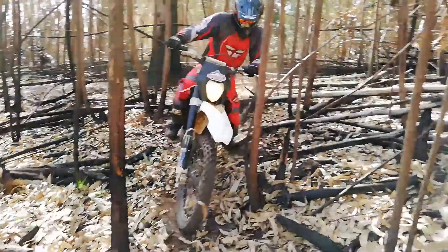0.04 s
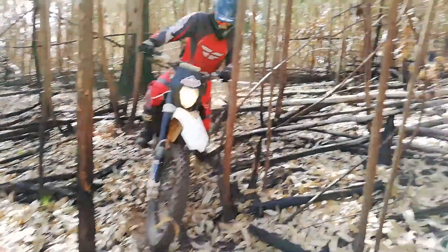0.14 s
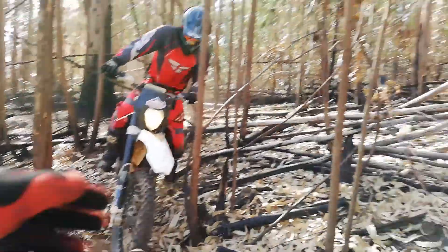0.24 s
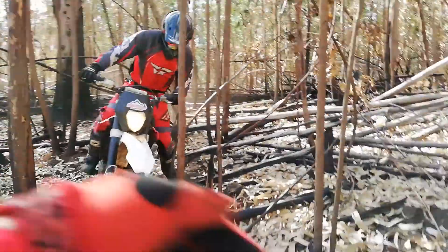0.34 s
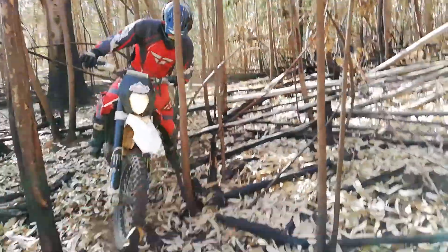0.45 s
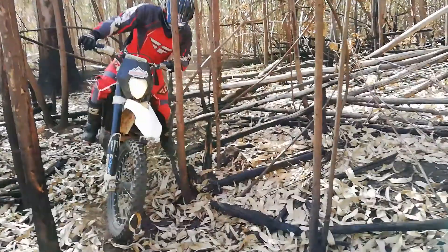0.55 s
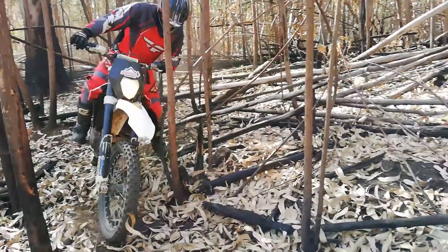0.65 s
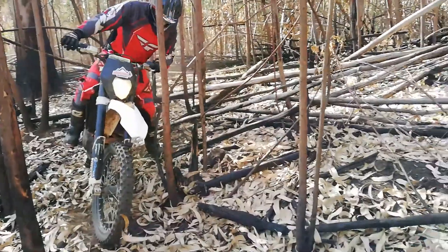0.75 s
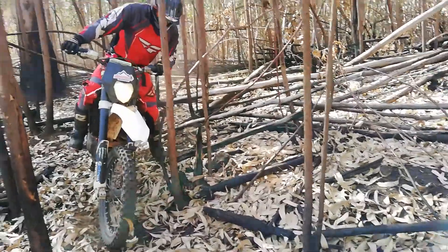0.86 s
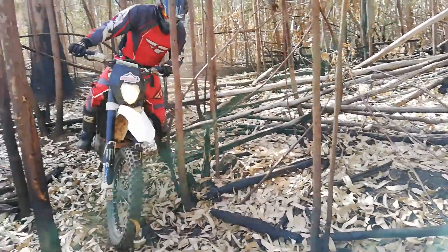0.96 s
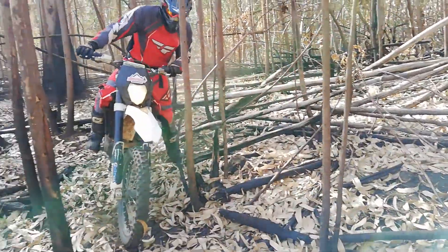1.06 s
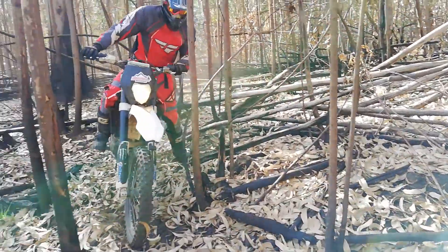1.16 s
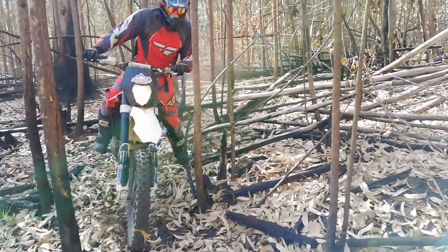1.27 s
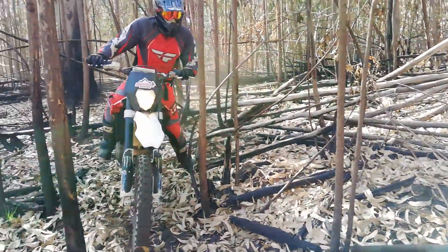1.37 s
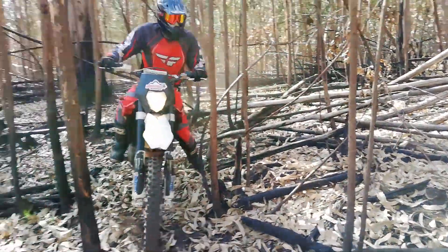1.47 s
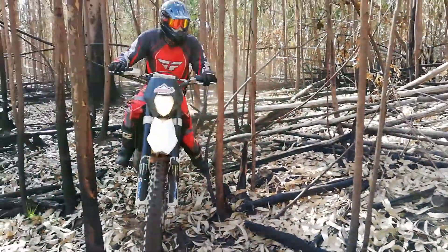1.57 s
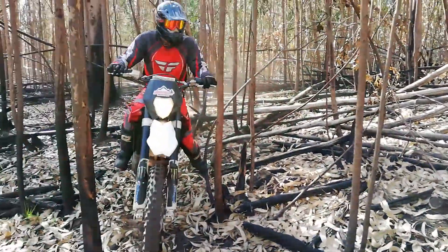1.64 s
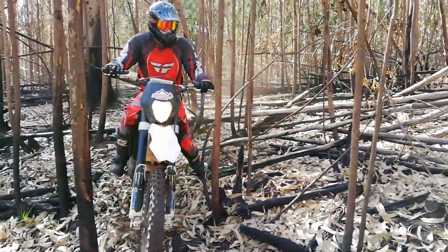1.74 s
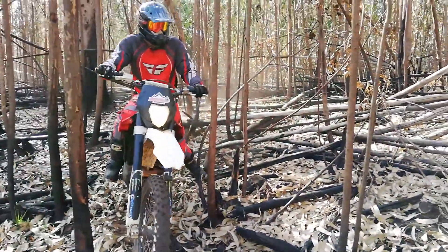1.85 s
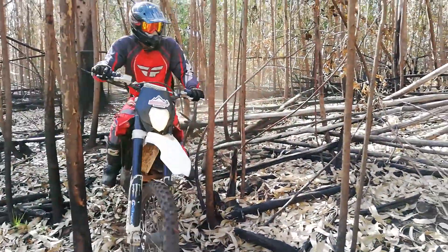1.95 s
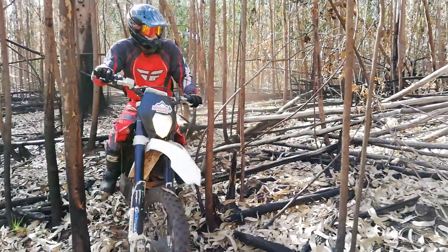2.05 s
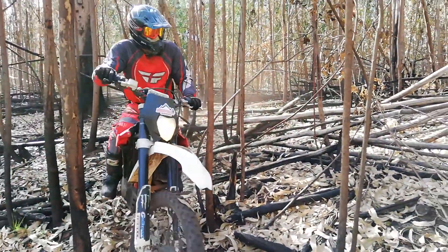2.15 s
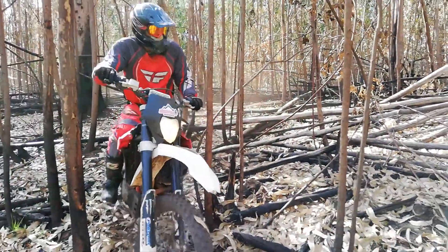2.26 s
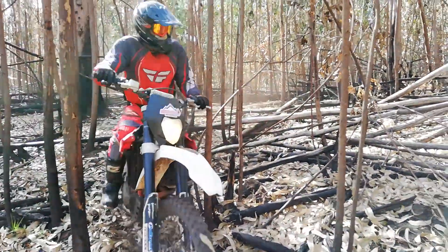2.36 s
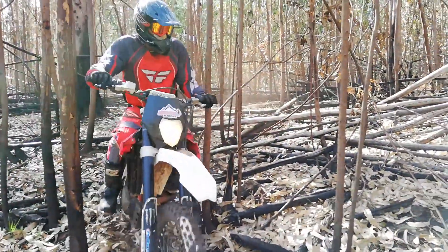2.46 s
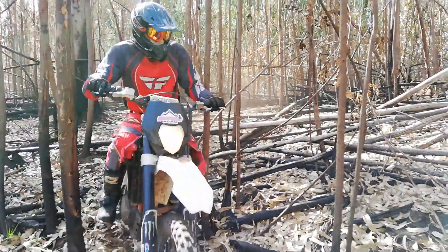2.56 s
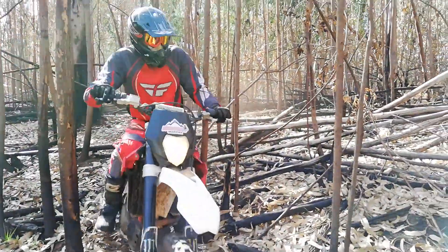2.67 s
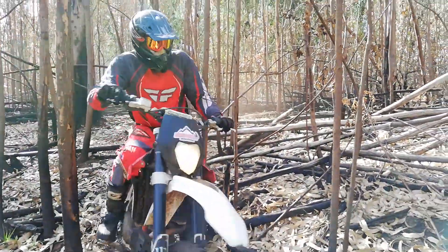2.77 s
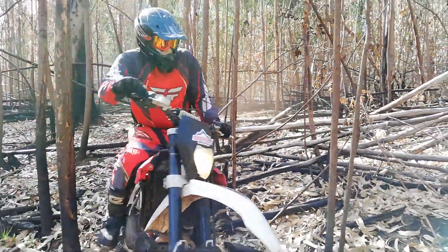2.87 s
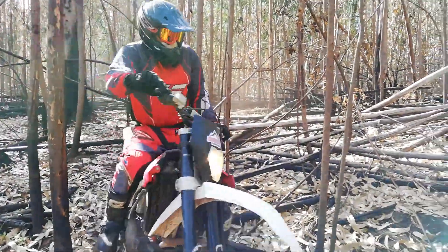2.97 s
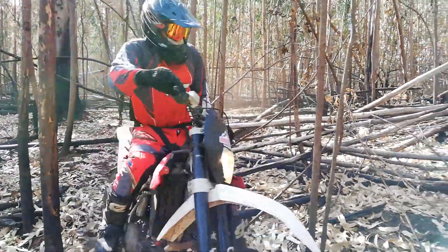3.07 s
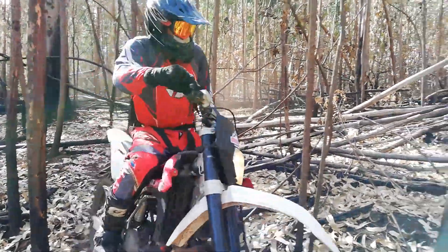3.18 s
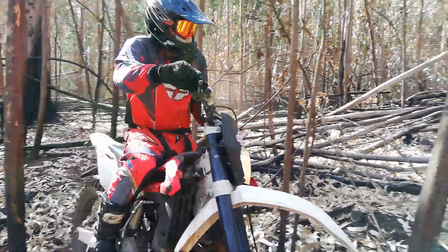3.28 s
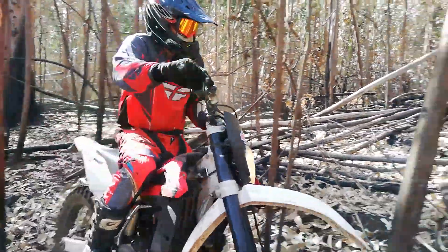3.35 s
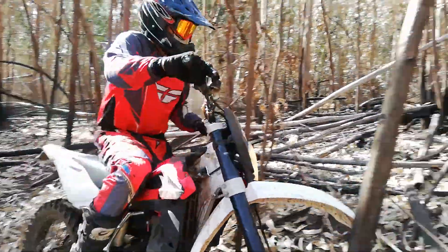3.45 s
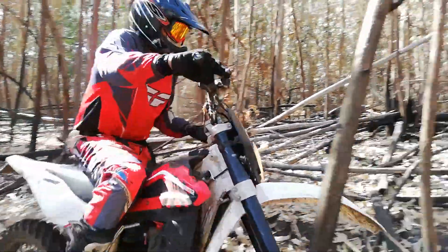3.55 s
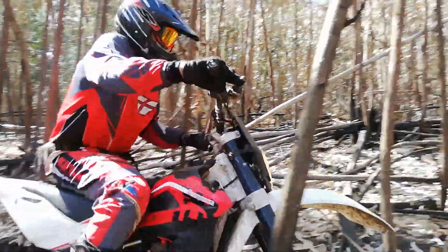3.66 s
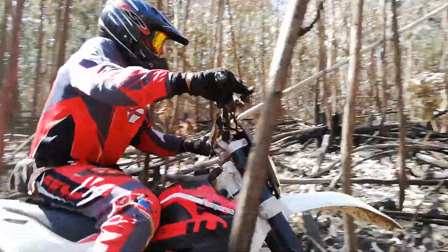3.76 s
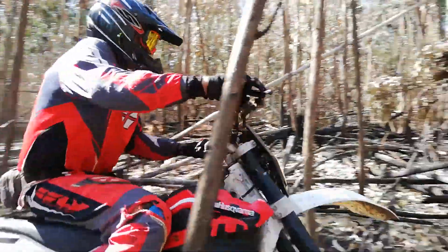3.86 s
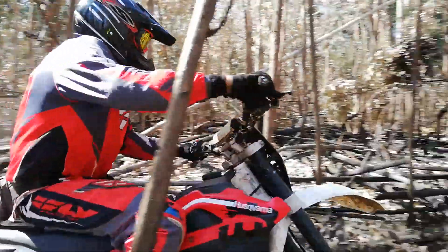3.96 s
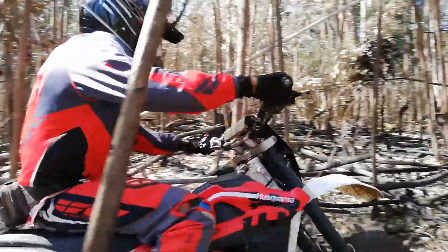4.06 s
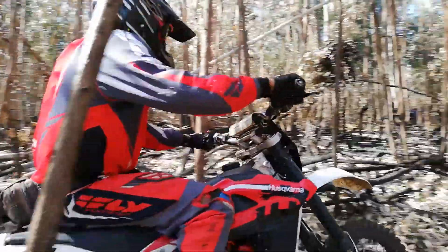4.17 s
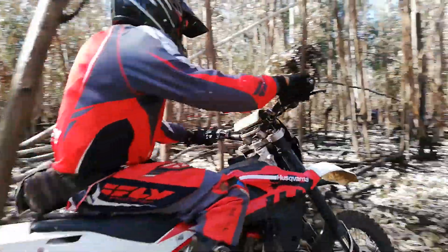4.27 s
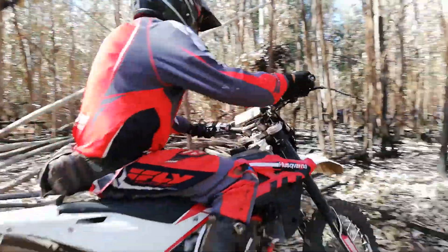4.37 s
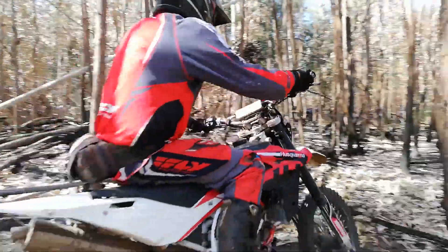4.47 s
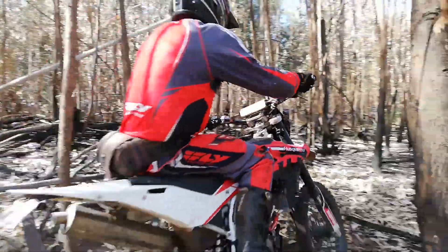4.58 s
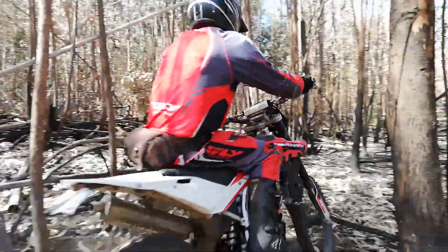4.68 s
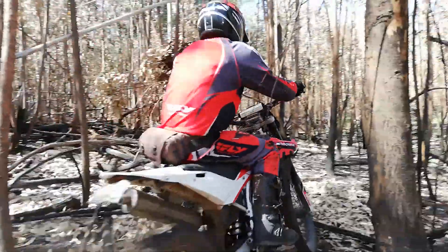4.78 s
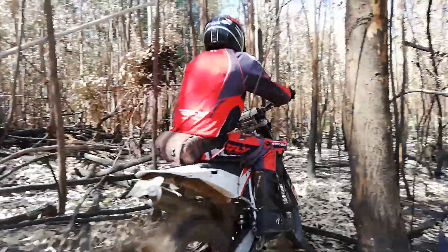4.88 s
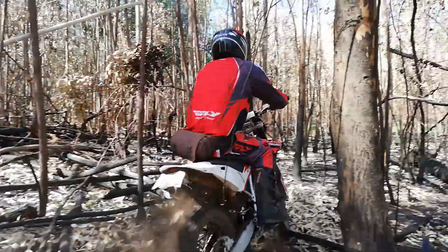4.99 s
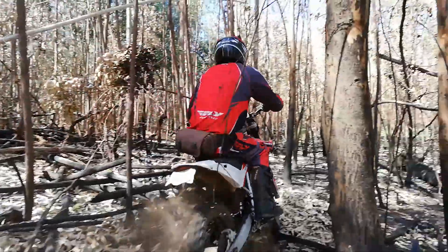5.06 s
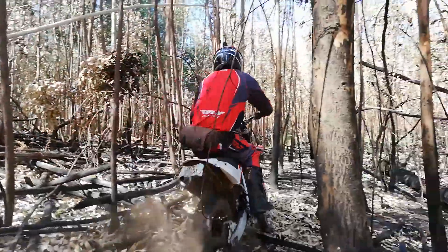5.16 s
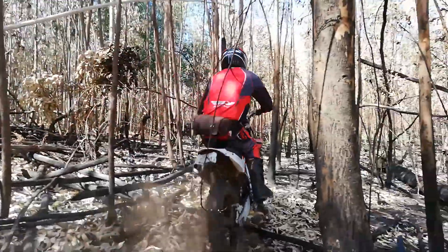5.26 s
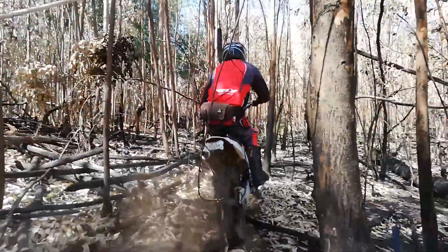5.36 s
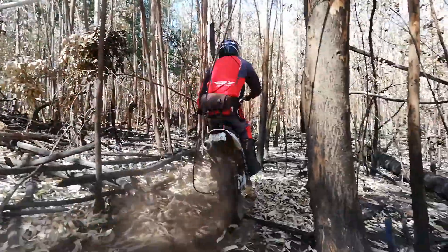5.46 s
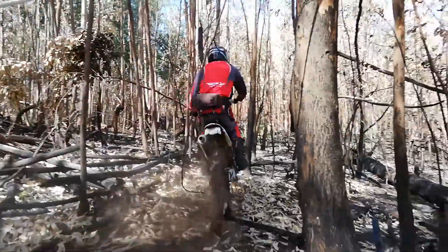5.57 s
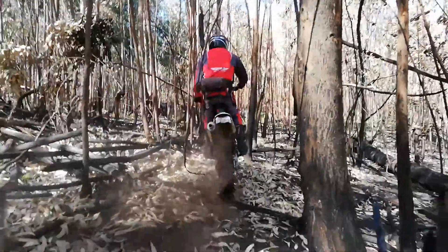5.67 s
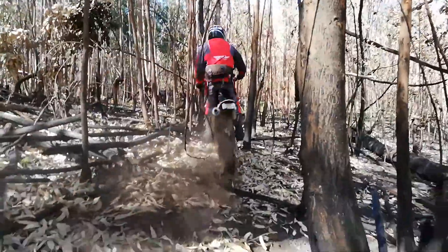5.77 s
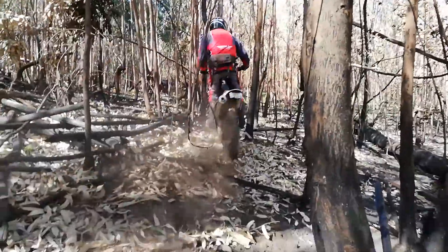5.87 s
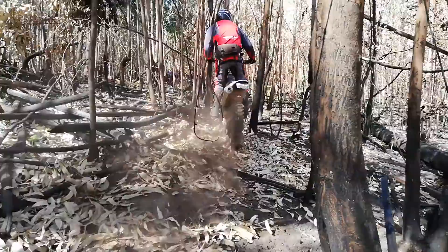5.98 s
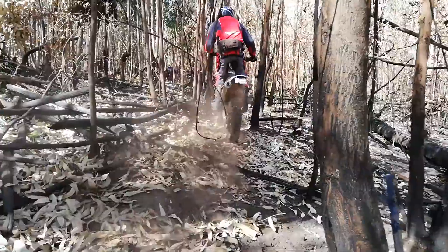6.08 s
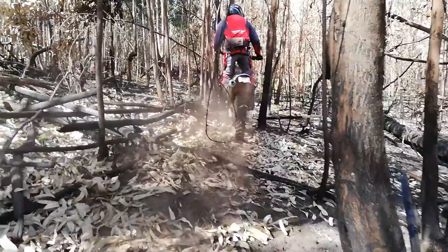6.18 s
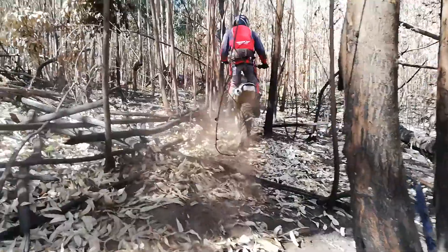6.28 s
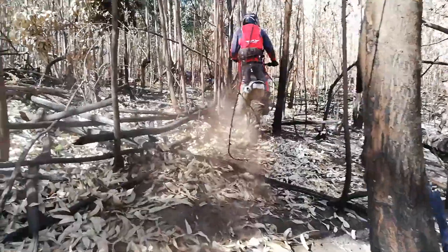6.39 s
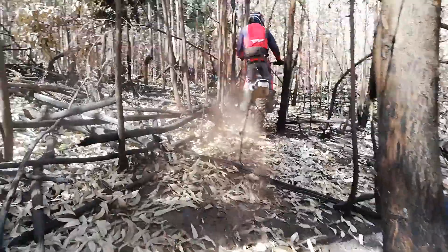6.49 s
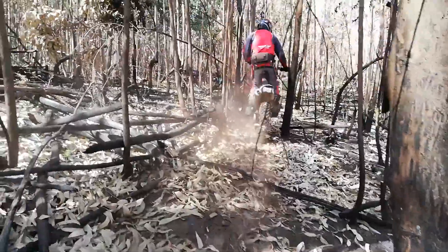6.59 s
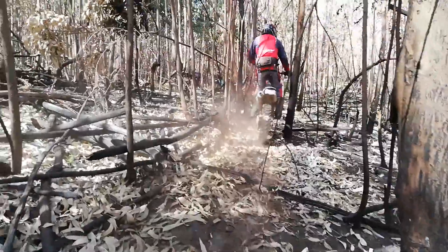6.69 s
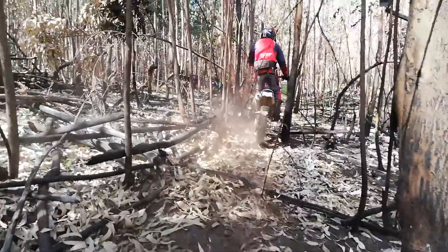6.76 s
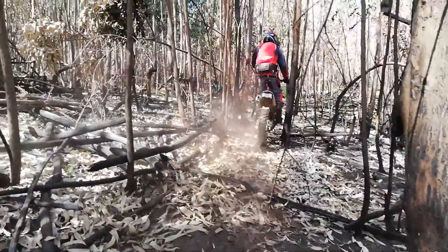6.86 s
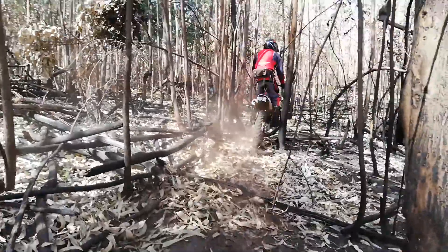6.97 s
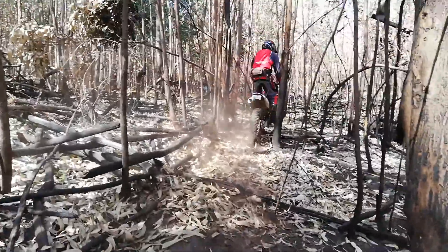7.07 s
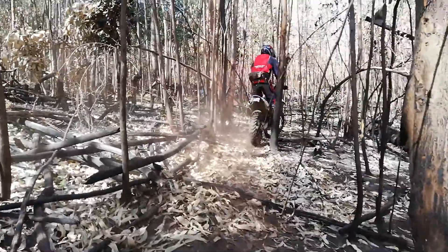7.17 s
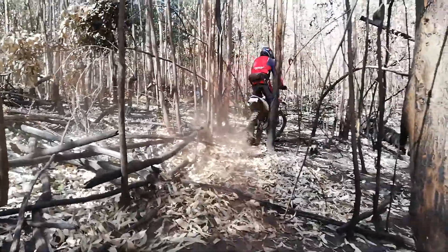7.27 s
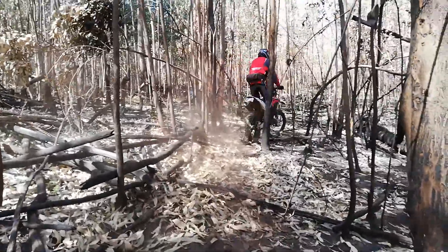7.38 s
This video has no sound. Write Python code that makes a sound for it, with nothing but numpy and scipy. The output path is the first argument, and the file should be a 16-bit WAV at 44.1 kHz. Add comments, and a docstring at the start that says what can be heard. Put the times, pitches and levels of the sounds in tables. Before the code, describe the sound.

A single-cylinder dirt bike idles close by, blips its throttle, creeps past over crackling leaves and pulls away among trees as twigs snap.

```python
"""Among trees, dry leaves underfoot: a single-cylinder four-stroke dirt bike idles about three metres away,
gets a blip of throttle, creeps past within a metre of the microphone and rides off to some six metres.
Each firing thumps through silencer resonances and rings the metal shell; valves and clatter are pulsed noise.
Grainy noise makes the leaves under the tyres and the branches that crack and sweep through the litter.
Twigs snap as short noise bursts; the brake and gears sing as wavering tones."""
import sys
import numpy as np
from scipy import signal
from scipy.fft import rfft, irfft, next_fast_len
from scipy.io import wavfile
from scipy.ndimage import map_coordinates

SR = 44100
rng = np.random.default_rng(int(sys.argv[2]) if len(sys.argv) > 2 else 0)


def inscribe(sig):
    """Save sig as 16-bit PCM at rate SR to the path in sys.argv[1].

    A 1-D sig is mono; a 2-D sig holds one channel per row.
    Samples are clipped to [-1, 1] before scaling.
    """
    pcm = np.round(np.clip(np.atleast_2d(sig).T, -1, 1) * 32767)
    wavfile.write(sys.argv[1], SR, pcm.astype(np.int16))


N = 327663
CRUISE_RATE, NEAR_M = 18, 2  # reference engine speed (firings per second) and distance (m)


def amp(db):
    """Decibels to gain."""
    return 10 ** (np.asarray(db) / 20)


def unit(x):
    """Scale to rms 1."""
    return x / np.sqrt(np.mean(x ** 2) + 1e-20)


def along(points, hz):
    """(pitch_hz, value) points read on a log frequency axis."""
    f, v = np.transpose(points)
    return np.interp(np.log(hz + 1), np.log(f + 1), v)


def clock():
    """The time of every sample in seconds."""
    return np.arange(N) / SR


def curves(rows):
    """One value per sample for each column after the time."""
    s, *cols = np.transpose(rows)
    return [np.interp(clock(), s, c) for c in cols]


def wobble(rate):
    """A smooth random curve, rate knots a second."""
    knots = rng.standard_normal(int(N * rate / SR) + 4)
    return map_coordinates(knots, [np.arange(N) * rate / SR])


def filtered(x, response):
    """x times a response of frequency."""
    m = next_fast_len(N + SR // 2)
    return irfft(rfft(x, m) * response(np.fft.rfftfreq(m, 1 / SR)), m)[..., :N]


def resonance(hz, centre, width):
    """A steep-sided resonance peak of height 1."""
    return (hz * width) ** 2 / ((hz * width) ** 2 + (hz * hz - centre ** 2) ** 2)


def causal(gain):
    """The shortest causal ring with this gain, along the last axis (minimum phase by cepstrum)."""
    cepstrum = irfft(np.log(np.maximum(gain, 1e-6)))
    half = cepstrum.shape[-1] // 2
    fold = np.r_[1, np.full(half - 1, 2), 1, np.zeros(half - 1)]
    return irfft(np.exp(rfft(cepstrum * fold)))


def add(track, s, sound):
    """Mix a sound into a track at time s."""
    part = track[..., max(0, round(s * SR)):][..., :sound.shape[-1]]
    part += sound[..., :part.shape[-1]]


# left-right likeness of the noises at the microphone: (pitch_hz, likeness 0-1)
LIKENESS = [(200, 0.97), (600, 0.26), (1200, 0.66), (2200, 0.025), (5000, 0.035), (15000, .03)]
# resonant peaks shared by all the noises: (pitch_hz, width_hz, level_db)
NOISE_PEAKS = [(1010, 74, 0), (1182, 20, 0), (1540, 83, 1.5), (3540, 150, -1.5), (6620, 63, 4.5),
               (8600, 70, -1.5)]


def rush(spectrum, grain_db):
    """Stereo noise, its middle at rms 1, clumped into tiny grains and coloured by shared resonant peaks."""
    pair = rng.standard_normal((2, N)) * amp(grain_db * wobble(1500))

    def colour(hz):
        turn = np.arccos(np.clip(along(LIKENESS, hz), 0, 1)) / 2
        peaks_db = sum(db * resonance(hz, centre, width) for centre, width, db in NOISE_PEAKS)
        return amp(along(spectrum, hz) + peaks_db) * [np.cos(turn), np.sin(turn)]

    mid, side = filtered(pair, colour)
    return np.array([mid + side, mid - side]) / np.std(mid)


# engine speed: (time_s, firings_per_s)
ENGINE_SPEED = [(0.0, 13.621), (0.255, 13.892), (0.326, 12.584), (1.262, 11.874), (1.432, 18.499),
                (1.699, 25.739), (1.887, 26.558), (2.153, 16.904), (2.421, 16.127), (2.644, 19.172),
                (2.797, 17.418), (3.303, 22.072), (3.649, 19.966), (3.987, 23.859), (4.479, 18.64),
                (5.08, 17.91), (5.524, 21.902), (5.668, 25.166), (6.045, 14.458), (6.556, 17.153),
                (6.948, 13.904), (7.43, 19.396)]


def firings():
    """Sample index of each firing: one per two turns of the crank."""
    cycles = np.cumsum(curves(ENGINE_SPEED)[0]) / SR + .82
    return np.flatnonzero(np.diff(np.floor(cycles)))


def bursts(fired, delay, rise, fall, scatter_db):
    """A power envelope of mean 1 with one burst per engine cycle; times in seconds from the firing."""
    t, power = np.arange(SR // 8) / SR, np.zeros(N)
    shape = (1 - np.exp(-t / rise)) ** 2 * np.exp(-t / fall)
    for i in fired:
        add(power, i / SR + delay, shape * amp(scatter_db * rng.standard_normal()) ** 2)
    return power / power.mean()


# the bike's path: (time_s, distance_m, share of the engine noise that comes from the tailpipe 0-1)
BIKE_PATH = [(0, 2.94, 0), (1.7, 3.33, 0.08), (2.85, 2.22, 0.03), (3.3, 1.24, 0.06), (3.95, 0.98, 0),
             (4.35, 1.55, 0.17), (4.8, 1.95, 0.94), (5.6, 4.7, 0.9), (6.1, 5.6, 0.4), (7.43, 5.6, 0.16)]


def facing():
    """Share of the engine noise that comes from the tailpipe."""
    return np.clip(curves(BIKE_PATH)[1], 0, 1)


# one blip, a gentle creep, then a pull away: (time_s, throttle opening 0-1)
THROTTLE_OPENING = [(0, 0.2), (1.28, 0.3), (1.6, 1), (1.92, 1), (2.08, 0.37), (3, 0.49), (4.1, 0.07),
                    (5, 0.92), (5.45, 0.63), (5.9, 0), (7.43, 0.28)]
# the bike swings round and its silencer comes into the open: (start_s, end_s)
TURN_SPAN = (3.02, 4.56)
# how each layer follows the ride: (level_db at the reference speed and distance, db per octave of revs,
# db per octave squared away from that speed, db per halving of distance, db from behind, db once turned,
# db at full throttle); the layers below add their own gains
RIDE_LEVELS = {"thud": (-24.5, -11.5, -38, 2.4, 4, 1.3, -2), "boom": (-19.5, 6, -8, 0.2, 5.5, -2.5, 1.2),
               "bark": (-27.6, 5, -9.5, 1.22, -4.4, 5.5, 3.5), "rasp": (-41.5, 6.5, -16, 10, -6, 17, 5.5),
               "clatter": (-33, 2.4, 0.3, 4.5, -0.9, -1, 6.5), "hiss": (-39.5, 2, 5, 6, -7, 4, 3.5),
               "shell": (-53, 0.5, 1.5, 1.2, 2.5, -5, 15.5), "leaves": (-39, 3.8, -2, 5, -1.9, 0, 4.24)}


def levels():
    """Each layer's level in dB, from revs, distance, heading and throttle."""
    revs = np.log2(curves(ENGINE_SPEED)[0] / CRUISE_RATE)
    near = np.log2(NEAR_M / curves(BIKE_PATH)[0])
    turned = np.interp(clock(), TURN_SPAN, [0, 1])
    throttle = curves(THROTTLE_OPENING)[0]
    ride = np.array([np.ones(N), revs, revs ** 2, near, facing(), turned, throttle])
    return {layer: np.dot(law, ride) for layer, law in RIDE_LEVELS.items()}


# silencer thud, boom, bark and rasp: (width_hz, level_db, share of the intake gulp)
SILENCER = [(59, -0.5, 0.059), (60.7, 1, 0.35), (137, 0, 0.77), (143, -2.5, 1)]
# the top silencer resonance shifts as the bike turns: (time_s, pitch_hz)
RASP_PITCH = [(0, 295), (1.2, 296), (1.7, 363), (3.3, 402), (3.9, 364), (4.4, 309), (4.9, 338), (5.4, 469),
              (6, 318), (7.43, 307)]
# firings that burn poorly as the throttle snaps shut: (time_s, level_db)
POOR_BURNS = [(2.05, -8), (5.875, -5.5)]
THUD_HZ, BOOM_HZ, BARK_HZ = 74.4, 123.9, 218.6  # low silencer resonances at the reference speed
HEAT_LIFT, BARK_LIFT = 0.11, 0.26  # powers by which thud and boom, and bark, rise with revs
BARK_NEAR_HZ = 52  # the bark sounds this much higher right beside the bike
INTAKE, INTAKE_FADE = 0.29, 2.4  # intake gulp at the reference speed; power by which it fades with revs
PASS_S, PASS_HALF_S = 4.037, 0.58  # the closest moment and half the length of the pass
# in the pass two sound paths cancel in a notch that slides down through the exhaust note
NOTCH_HZ, NOTCH_OCT_PER_S, NOTCH_WIDTH_OCT, NOTCH_DB = 181, 1, 0.33, -9


def exhaust(fired, level):
    """Each firing rings the silencer; a quarter cycle later the intake gulps."""
    hz, s = np.fft.rfftfreq(SR // 5, 1 / SR), fired[:, None] / SR
    rate = curves(ENGINE_SPEED)[0][fired, None]
    revs = rate / CRUISE_RATE
    passing = np.exp(-((s - PASS_S) / PASS_HALF_S) ** 2)
    intake = np.minimum(INTAKE * (CRUISE_RATE / rate) ** INTAKE_FADE + .25 * passing, 1)
    late = np.exp(-2j * np.pi * hz / rate * .247)
    # hotter gas at higher revs lifts the low resonances
    heat = revs ** HEAT_LIFT
    bark_hz = BARK_HZ * revs ** BARK_LIFT + BARK_NEAR_HZ * passing
    centres = THUD_HZ * heat, BOOM_HZ * heat, bark_hz, curves(RASP_PITCH)[0][fired, None]
    burn_db = sum(db * (np.abs(s - when) < .025) for when, db in POOR_BURNS)
    off_notch = np.log2((hz + 1) / NOTCH_HZ) + NOTCH_OCT_PER_S * (s - PASS_S)
    notch = amp(NOTCH_DB * passing ** 0.59 * np.exp(-(off_notch / NOTCH_WIDTH_OCT) ** 2))
    blow = gulp = 0
    for (width, db, share), layer, centre in zip(SILENCER, ("thud", "boom", "bark", "rasp"), centres):
        centre = centre * (1 + 0.015 * rng.standard_normal(rate.shape))
        # trim each peak well above its centre and below 24 Hz
        peak = resonance(hz, centre, width) / (1 + (hz / (1.28 * centre)) ** 9) / (1 + (24 / (hz + 1)) ** 3)
        with_gulp = np.abs(peak * (1 + share * intake * late)) ** 2
        peak /= np.sqrt(np.mean(with_gulp, axis=1, keepdims=True))
        scatter_db = 0.42 * rng.standard_normal(rate.shape)
        size = amp(level[layer][fired, None] + db + burn_db + scatter_db)
        power = (size * peak * notch) ** 2 * SR / rate
        blow = blow + power
        gulp = gulp + power * (share * intake) ** 2
    # a faint broad skirt under the peaks
    skirt = 0.011 / (1 + (hz / 900) ** 2)
    gulps = irfft(rfft(causal(np.sqrt(gulp) + .5 * skirt)) * late)
    thumps = causal(np.sqrt(blow) + skirt) + gulps
    out = np.zeros(N)
    for i, thump in zip(fired, thumps):
        add(out, i / SR - .0005, thump)
    return out


def airbox(fired, hz=50, db=-21, fall=0.029):
    """Near idle each slow intake stroke leaves a low, sagging throb in the airbox."""
    out, t = np.zeros(N), np.arange(SR // 8) / SR
    for i, rate in zip(fired, curves(ENGINE_SPEED)[0][fired]):
        turns = hz * (1 + 0.015 * rng.standard_normal()) * t * (1 - 1.3 * t)
        size = amp(db + rng.standard_normal()) * (12 / rate) ** 3  # weaker as revs rise
        add(out, i / SR + 0.289 / rate, size * np.exp(-t / fall) * np.sin(2 * np.pi * turns))
    return out


SURGE_DB, SURGE_DB_PER_OCT = -37, 12  # throb gain at the reference speed, and its growth with revs


def surge():
    """At high revs the pumped air throbs at the firing rate and its octave."""
    rate = curves(ENGINE_SPEED)[0]
    angle = 2 * np.pi * np.cumsum(rate) / SR
    size = amp(SURGE_DB + SURGE_DB_PER_OCT * np.log2(rate / CRUISE_RATE))
    return size * (0.61 * np.sin(angle) + 0.92 * np.sin(2 * angle))


SAG_S, SAG_HZ = 0.0024, 55  # the deepest waves leave the silencer this much later, below this frequency


def sag(hz):
    """A phase response in which low waves lag, so that each thump droops in pitch."""
    return np.exp(-2j * np.pi * SAG_S * SAG_HZ * (np.arctan(hz / SAG_HZ) - np.pi / 2))


# the silencer shell: (pitch_hz, front_db, behind_db, t60_s)
SHELL_MODES = [(489.5, -4.5, 14, 0.11), (650, 4.5, 0, 0.081), (748, -1, -5, 0.15), (868, -1, -1, 0.1),
               (990, 1, 0, 0.087), (1172, 0.5, 4.5, 0.09), (1340, 0, 10, 0.052), (1534, -8, -10, 0.095),
               (1770, -9, 14, 0.025)]


def shell(fired, level):
    """Every firing rings the metal shell, at slightly new strengths, most strongly under load."""
    out, t = np.zeros(N), np.arange(SR // 12) / SR
    hz, front_db, rear_db, t60 = np.transpose(SHELL_MODES)[..., None]
    for i, rear in zip(fired, facing()[fired] ** 2):
        mode_db = (1 - rear) * front_db + rear * rear_db + 2.5 * rng.standard_normal(hz.shape)
        size = amp(mode_db - 60 * t / t60)
        detune = 1 + 0.0089 * rng.standard_normal(hz.shape)
        # the modes start out of step, so the ring is a smeared rasp
        wave = np.sin(2 * np.pi * hz * detune * (t - hz * 2e-6))
        ring = size * wave * (1 - np.exp(-t / 0.00047))
        add(out, i / SR + 0.00508 * rear - .001, ring.sum(axis=0))
    return amp(level["shell"]) * unit(out)


# a nearby trunk echoes the tailpipe: (time_s, delay_s)
TRUNK_DELAY = [(4.2, .00155), (4.55, .00195), (5.4, .00253), (7.43, .0028)]


def trunk_echo(x):
    """An echo whose delay grows as the bike leaves, sweeping the colour downward."""
    t = clock()
    then = t - curves(TRUNK_DELAY)[0]
    return unit(x + 0.46 * np.array([np.interp(then, t, side) for side in x]))


# noise colour of the engine's clatter: (pitch_hz, density_db per Hz)
CLATTER_COLOUR = [(300, 5.5), (560, -9.5), (700, -1.5), (1000, 2.5), (1300, -2), (1650, -1.5),
                  (1900, -11.5), (2300, -24), (2800, -14), (4000, -32)]
# noise colour of the tailpipe gas: (pitch_hz, density_db per Hz)
TAILPIPE_COLOUR = [(300, 0), (500, 14.5), (700, 4), (1250, 5.5), (1800, 0.5), (2600, -26), (4000, -41)]
# noise colour of the hiss: (pitch_hz, density_db per Hz)
HISS_COLOUR = [(1240, -10), (2100, -0.5), (2670, -2.5), (3500, 1.5), (4730, -6.5), (6000, -11), (7800, -73),
               (13200, -120)]


def machine(fired, level):
    """Clatter and valve ticks from the front, a puff of gas after each firing from the rear."""
    rear = facing()
    front = 1 - rear
    knock = bursts(fired, delay=-.003, rise=.002, fall=.012, scatter_db=1.5)
    valves = bursts(fired, delay=-.004, rise=.0025, fall=.0037, scatter_db=1.4)
    puff = bursts(fired, delay=.0025, rise=.0028, fall=.0058, scatter_db=.8)
    clatter = np.sqrt(front * (0.53 + 0.18 * knock)) * rush(CLATTER_COLOUR, grain_db=-2.0)
    gas = np.sqrt(rear * (0.11 + 0.34 * puff)) * trunk_echo(rush(TAILPIPE_COLOUR, grain_db=0.0))
    hiss = np.sqrt(0.4 + 0.12 * valves + 0.37 * rear * puff) * rush(HISS_COLOUR, grain_db=2.0)
    engine = amp(level["clatter"] - 3.0) * (clatter + gas) + amp(level["hiss"]) * hiss
    ticking = 0.19 * front * valves + 0.24 * rear * puff  # power of the finest ticks
    return engine, ticking


# brake squeaks, gear whines and passing engine resonances: (centre_s, pitch_hz, level_db, half_length_s,
# waver_hz, share that pulses with the firings 0-1)
SINGING = [(0.61, 7970, -36.5, 0.029, 30, 0), (0.7, 8000, -41, 0.031, 30, 0),
           (2.15, 3170, -49, 0.5, 55, 0.2), (2.507, 2380, -47, 0.2, 59.7, 0.5),
           (2.952, 3300, -46, 0.15, 60, 0.2), (3.1, 988, -38.5, 0.75, 55, 1),
           (3.85, 902, -32, 0.16, 68.8, 0.5), (3.988, 1149, -29.5, 0.084, 55.1, 0.4),
           (3.8, 1950, -37, 0.36, 130.5, 0.7), (4.24, 2510, -35.5, 0.097, 129.8, 1),
           (4.325, 1817, -35.5, 0.14, 80, 0.74), (4.354, 856, -36.5, .1, 49.8, .3),
           (6.602, 1037, -49, 0.33, 42, 0.9)]


def squeaks(fired):
    """The brake disc, gears and engine covers sing briefly on unsteady notes, shaken by the firings."""
    t, out = clock(), 0
    shake = bursts(fired, delay=.001, rise=0.0022, fall=0.0063, scatter_db=2.5)
    for s, hz, db, half, waver_hz, share in SINGING:
        turns = hz * t + np.cumsum(waver_hz * wobble(250)) / SR
        pulsing = np.sqrt(1 + share * (shake - 1))
        swell = np.exp(-((t - s) / half) ** 2)
        out = out + amp(db) * swell * pulsing * np.sin(2 * np.pi * turns)
    return out


# noise colour of dry leaves: (pitch_hz, density_db per Hz)
LEAF_COLOUR = [(2710, -9), (4600, -2), (5850, -3), (9450, 1), (10400, -2.5), (12300, -16), (15200, -23),
               (16000, -29)]


def litter(ticking, level):
    """Dry leaves crackle under the tyres, mingling with the engine's finest ticks."""
    crackle = 0.63 * rush(LEAF_COLOUR, grain_db=2.0) * amp(1.45 * wobble(40))
    ticks = np.sqrt(ticking) * rush(LEAF_COLOUR, grain_db=3.5)
    return amp(level["leaves"] + 0.5) * (crackle + ticks)


# noise colour of a branch sweeping the ground: (pitch_hz, density_db per Hz)
SWEEP_COLOUR = [(530, -42), (900, -0.5), (1260, 3.5), (1510, -4), (1640, 7.5), (1970, 8), (2390, 5),
                (2630, 3), (6720, 11), (9530, 6), (16000, -83)]
# branches cracking and sweeping through leaves: (peak_s, level_db, rise_s, fall_s)
BRANCH_SWELLS = [(.18, -33, 0.015, 0.091), (.38, -36, 0.025, 0.042), (.79, -39, 0.062, 0.077),
                 (2.695, -32.5, 0.021, 0.027), (3.19, -35.5, 0.011, 0.13), (6.02, -40, 0.09, 0.14),
                 (6.934, -21, 0.026, 0.021), (7.0, -36, 0.017, 0.1), (7.18, -37, 0.061, 0.062)]
BRANCH_LEAVES_DB = -5.5  # the leaves that a branch stirs, against the branch itself


def branches():
    """Wood fibres tear in a quick, uneven swell of crackles that dies away in the leaves."""
    t = clock()
    swell = sum(amp(db) * np.exp(-np.maximum((s - t) / rise, (t - s) / fall))
                for s, db, rise, fall in BRANCH_SWELLS)
    wood = rush(SWEEP_COLOUR, grain_db=4.0)
    leaves = amp(BRANCH_LEAVES_DB) * rush(LEAF_COLOUR, grain_db=4.5)
    return swell * amp(1.7 * wobble(160)) * (wood + leaves)


# colour of snapping wood: (pitch_hz, gain_db)
TWIG_COLOUR = [(1500, -35), (4000, -12), (6100, 12.5), (7800, -6), (9700, 9), (12000, -7), (16000, -18)]
# twigs snapping: (start_s, peak_db before a lift of 6 dB)
TWIG_SNAPS = [(0.3208, -19.5), (2.6944, -28), (6.1742, -12.5), (6.245, -20.5), (6.2804, -28)]


def twigs():
    """Each twig breaks with a sharp tick and a short splintering tail."""
    out, t = np.zeros((2, N)), np.arange(SR // 20) / SR
    wood = causal(amp(along(TWIG_COLOUR, np.fft.rfftfreq(SR // 100 + 1, 1 / SR))))
    for s, db in TWIG_SNAPS:
        fade = np.exp(-t / 0.00062) + 0.14 * np.exp(-t / 0.0083)
        burst = rng.standard_normal((2, len(t))) * fade
        snap = signal.fftconvolve(burst, wood[None], axes=1)
        add(out, s, amp(db + 6.0) * snap / np.abs(snap).max())
    return out


# how long the woods ring: (pitch_hz, t60_s)
FOREST_DECAY = [(100, 1), (1000, 0.75), (10000, 0.067)]


def forest(x):
    """Trunks scatter a short echo: noise that dies sooner the higher its pitch."""
    hz, t, z = signal.stft(rng.standard_normal((2, SR // 2)), SR, nperseg=256)
    decay = amp(-60 * t / along(FOREST_DECAY, hz)[:, None])
    tail = signal.istft(z * decay, SR, nperseg=256)[1]
    return signal.fftconvolve(x, tail / np.linalg.norm(tail[0]), axes=1)[:, :N]


# the thumps reach the left microphone port first: (pitch_hz, lead_rad)
PORT_LEAD = [(40, .03), (130, 0.043), (320, 0.53), (700, 0.18)]
# the ports colour short waves differently: (pitch_hz, left_minus_right_db)
PORT_LEAN = [(300, -4), (650, 4), (1200, -3.5), (2400, -3.5), (4400, -6), (8000, 3), (13000, 10.5)]


def scene():
    """The bike and the litter it disturbs, among the trees, heard at two microphone ports."""
    fired, level = firings(), levels()
    engine, ticking = machine(fired, level)
    thumps = exhaust(fired, level) + airbox(fired) + surge()
    bright = engine + shell(fired, level) + squeaks(fired)
    bright = bright + litter(ticking, level) + branches() + twigs()
    # half of each difference goes to either port
    thumps = filtered(thumps, lambda hz: sag(hz) * np.exp(1j * np.outer([.5, -.5], along(PORT_LEAD, hz))))
    bright = filtered(bright, lambda hz: amp(np.outer([.5, -.5], along(PORT_LEAN, hz))))
    return thumps + bright + forest(amp(-33.5) * thumps + amp(-15.5) * bright)


TOP_HZ = 15950  # band limit


def record(dry):
    """Nothing passes above the band limit."""
    return filtered(dry, lambda hz: hz < TOP_HZ)


dry = scene()
out = record(dry)
inscribe(out)
```